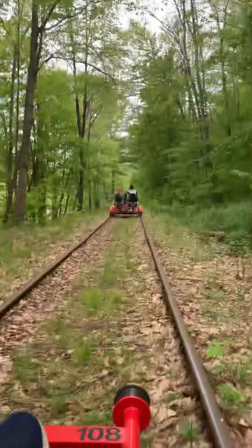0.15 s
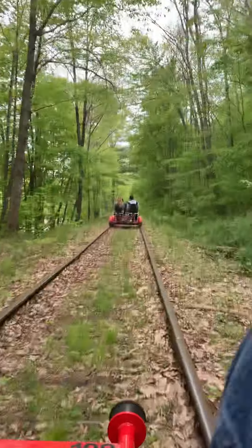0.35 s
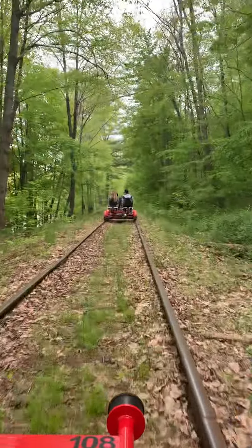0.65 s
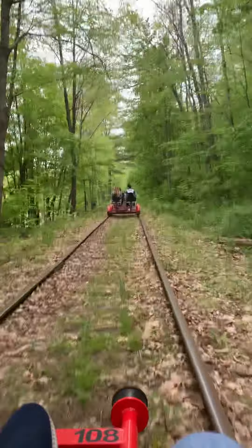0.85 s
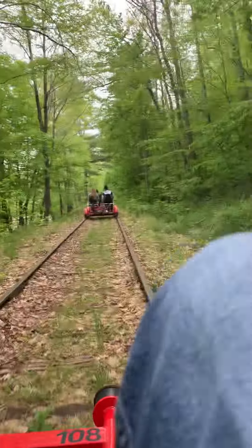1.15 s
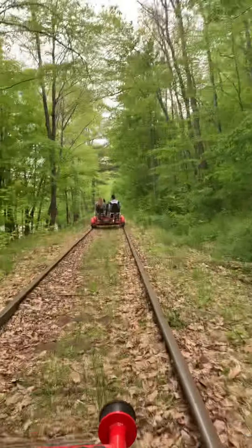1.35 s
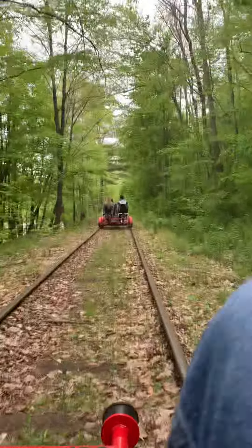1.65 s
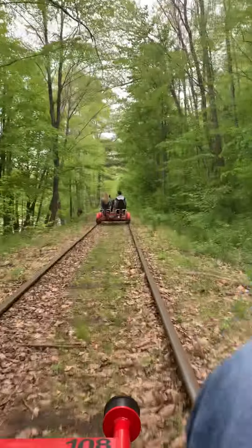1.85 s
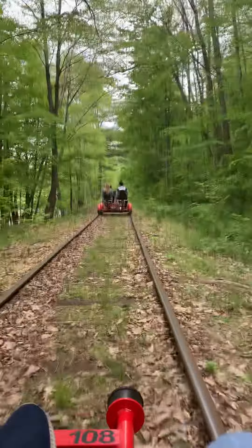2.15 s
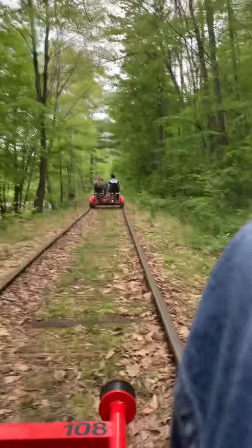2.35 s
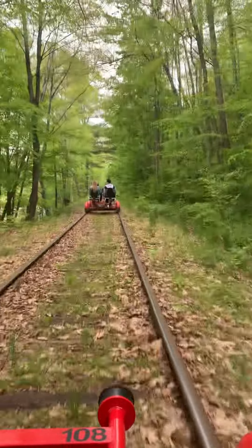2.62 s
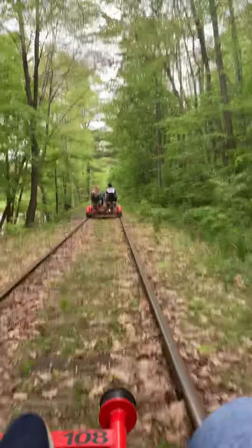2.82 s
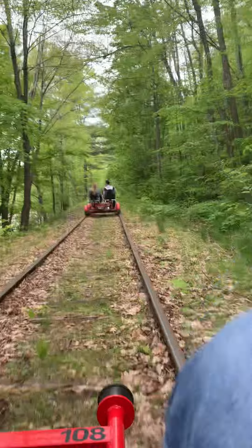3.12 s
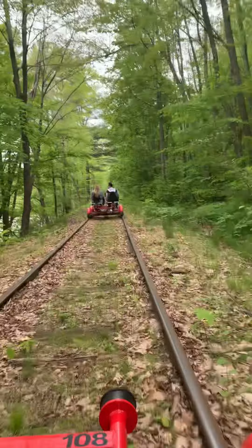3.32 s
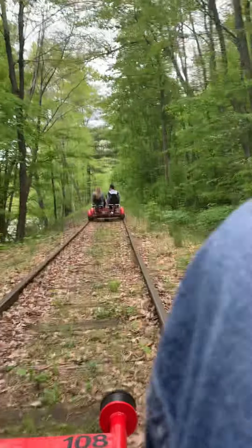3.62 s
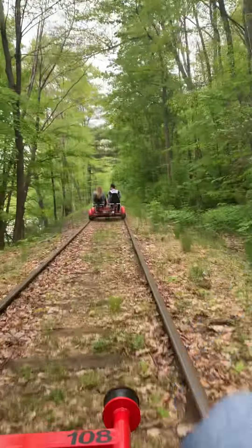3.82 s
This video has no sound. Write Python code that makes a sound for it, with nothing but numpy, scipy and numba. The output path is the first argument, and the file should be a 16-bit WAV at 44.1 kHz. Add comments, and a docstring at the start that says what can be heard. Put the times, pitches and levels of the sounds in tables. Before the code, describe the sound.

A pedal rail cart rolls continuously for about four seconds on rough track, heard close by a handheld phone on board outdoors. Low wavering rumble swells near 0.4 s beneath gritty wheel grind and faint chain hiss. Uneven clacks with quick chatter hit strongly around 0.4, 0.6, 0.9, 1.5, 2.2, 2.9 and 3.25 s. Loose parts rattle between; thin metal ticks appear from 0.9 s, clearest near 1.7, 2.3 and 3.25.

```python
"""A pedal cart rolls on an old rail through woods, heard by a phone held on board.
Throughout, rough rail rings the frame in a low rumble, the wheels grind and the chain hisses.
From the first moments bumps make loose parts clack and chatter; between clacks they knock at random.
Chain links click faintly at random; from 0.9 s a small metal part ticks now and then.
Two microphone ports hear the treble with a fixed lag."""
import sys
import numpy as np
from scipy import signal
from scipy.fft import rfft, irfft
from scipy.io import wavfile
from scipy.ndimage import uniform_filter1d
from numba import njit

SR = 44100
rng = np.random.default_rng(int(sys.argv[2]) if len(sys.argv) > 2 else 0)


def attenuation_scalar(level_db):
    """Turn a level in dB into a linear amplitude multiplier (20 dB per decade)."""
    decades = np.asarray(level_db, float) / 20
    return 10 ** decades


def output_pcm(signal):
    """Save a mono or channel-first signal as 16-bit PCM at the path in sys.argv[1].

    Samples are clipped to [-1, 1] before scaling.
    """
    pcm = np.clip(np.atleast_2d(signal).T, -1, 1) * 32767
    wavfile.write(sys.argv[1], SR, np.round(pcm).astype(np.int16))


N = 175518


def unit(x):
    """Scale to rms 1."""
    return x / np.sqrt(np.mean(x ** 2))


@njit
def svf(x, hz, width_hz):
    """Band-pass whose centre may move, gain 1 at the centre."""
    y = np.empty(x.shape)
    for c in range(x.shape[0]):
        band, low = 0., 0.
        for i in range(x.shape[1]):
            g, k = np.tan(np.pi * hz[i] / SR), width_hz / hz[i]
            v = (band + g * (x[c, i] - low)) / (1 + g * (g + k))
            band, low, y[c, i] = 2 * v - band, low + 2 * g * v, k * v
    return y


def walk(rate_hz):
    """Random levels held 1 / rate s and slewed twice; spread near 1."""
    k = int(SR / rate_hz)
    held = np.repeat(rng.standard_normal(N // k + 1), k)
    return 1.26 * uniform_filter1d(uniform_filter1d(held, k), k)[:N]


def ring(x, modes, drift=0.):
    """Sum of resonators with wandering centres, each at equal power for its dB."""
    out = 0
    for hz, width_hz, db in modes:
        centre_hz = hz * (1 + drift * walk(6))
        out = out + attenuation_scalar(db) * np.sqrt(2000 / width_hz) * svf(x, centre_hz, 1. * width_hz)
    return out


def colour(x, points):
    """Filter to a spectrum of (f/Hz, level/dB) points, closed at both ends."""
    f, p = np.fft.rfftfreq(N, 1 / SR) + 1, np.array(points, float)
    gain_db = np.interp(np.log(f), np.log(p[:, 0]), p[:, 1], -70, -70)
    return irfft(rfft(x) * attenuation_scalar(gain_db), N)


def grit(spread_db):
    """Noise of many small impacts of uneven size, one stream a port."""
    return unit(rng.standard_normal((2, N)) * attenuation_scalar(spread_db * rng.exponential(size=N)))


def flicker(noise, low_hz, shared_db, own_db):
    """Half-octave bands of a noise swell together and flicker alone."""
    shared, out = walk(23.98), 0
    for hz in low_hz * 2 ** (np.arange(9) / 2):
        if hz < 17000:
            gain = attenuation_scalar(shared_db * shared + own_db * walk(36))
            out = out + gain * svf(noise, np.full(N, hz), hz / 3.06)
    return unit(out)


def burst(times_s, gains, length_s, rise_s, tail_s):
    """Envelope: a rise, a chatter that dies over its length, a weaker tail."""
    env, t = np.full(N, 1e-9), np.arange(int(.3 * SR)) / SR
    for s, gain, d in zip(times_s, gains, length_s + 0 * times_s):
        i = int(s * SR)
        decay = np.exp(-(t / d) ** 2) + attenuation_scalar(-7) * np.exp(-t / tail_s)
        env[i:i + len(t)] += gain * ((1 - np.exp(-t / rise_s)) * decay)[:N - i]
    return env


def scattered(per_s, peak_db, spread_db, length_s, rise_s):
    """Envelope of knocks at random moments and of uneven size."""
    moment, weakness = rng.random((int(per_s * N / SR), 2)).T
    return burst(moment * (N - 9) / SR, attenuation_scalar(peak_db - spread_db * weakness), length_s, rise_s, 2 * length_s)


def bounces(times_s, db, count=6):
    """Each hit is a bare impulse and a few weaker rebounds at uneven gaps, in either direction."""
    bounce_s, bounce_db = 0.0035, -2.27  # per rebound
    out, rows, k = np.zeros(N), rng.random((len(times_s), 2, count)), np.arange(count)
    late_s = bounce_s * (k + (k > 0) * (rows[:, 0] - .5))
    at = np.minimum((times_s[:, None] + late_s) * SR, N - 1).astype(int)
    np.add.at(out, at, attenuation_scalar(db[:, None] + bounce_db * k) * np.sign(rows[:, 1] - .5))
    return out


# rail shaking the frame: t/s, rumble level/dB, loudest groan f/Hz
RAIL_SHAKE = [(0.0, -17, 192), (0.02, -23, 241), (0.15, -25, 163), (0.21, -19, 266), (0.35, -22.5, 197),
              (0.4, -9.5, 266), (0.43, -23, 240), (0.7, -19.5, 180), (0.75, -27.5, 184), (0.84, -23, 256),
              (0.99, -25, 193), (1.09, -28, 194), (1.16, -17.5, 275), (1.3, -19.5, 199), (1.38, -22, 216),
              (1.46, -18, 232), (1.51, -22, 303), (1.57, -20.5, 168), (1.63, -20, 294), (1.71, -26.5, 196),
              (1.78, -19, 310), (1.95, -22, 159), (2.07, -22, 325), (2.11, -23, 190), (2.23, -16.5, 172),
              (2.4, -22, 211), (2.65, -23, 210), (2.74, -19.5, 230), (2.77, -26, 250), (2.87, -21, 189),
              (3.06, -21, 262), (3.2, -19, 186), (3.28, -21, 253), (3.35, -17.5, 190), (3.5, -19, 199),
              (3.52, -17, 260), (3.56, -21.5, 205), (3.85, -19.5, 230), (3.89, -21, 173), (3.98, -22, 220)]
# low frame modes: f/Hz, width/Hz, relative level/dB
FRAME_MODES = [(77.6, 120, -11.5), (119, 90, -15.5), (145.7, 18.7, 1), (170.4, 17.4, 0.5), (214, 31, -4.5),
               (256.3, 24, -9), (306, 19.4, -3), (340.3, 23.6, -2), (409, 43, -13.5)]
# wheel contact and chain: t/s, relative grind level/dB, relative hiss level/dB
DRIVE_LEVELS = [(0.0, -26, -50.5), (0.45, -20.5, -41), (0.65, -26.5, -55), (0.82, -23, -45),
                (0.92, -23, -44), (1.06, -28, -42.5), (1.45, -24, -46), (1.58, -26.5, -40),
                (1.72, -28, -54), (1.85, -23.5, -39.5), (2.05, -22.5, -48.5), (2.21, -26, -40.5),
                (2.35, -28.5, -43), (2.55, -25, -43.5), (2.76, -27, -47.5), (3.2, -22.5, -45),
                (3.41, -26, -43), (3.6, -25.5, -46), (3.98, -24, -45)]
# wheel-on-rail grind spectrum: f/Hz, relative level per Hz/dB
GRIND_SPECTRUM = [(250, -29), (450, 7), (650, 11.5), (1000, 4.5), (1500, -6), (2000, -7), (3000, -9),
                  (4200, -12), (6000, -18)]
# chain hiss spectrum: f/Hz, relative level per Hz/dB
CHAIN_SPECTRUM = [(3000, -42), (4500, 1.5), (5700, 5), (6500, -0.5), (8200, 3.5), (10000, -12),
                  (12000, -6.5), (15700, -13)]
# loose-part modes, also in clacks() and rattles(): f/Hz, width/Hz, relative level/dB
PART_MODES = [(169, 130, 4), (324, 87, 3), (599, 58, -1), (780, 43, -3), (980, 110, -4), (1260, 44, 0.5),
              (1480, 185, 1.5), (2040, 110, -5.5), (2510, 67, -8.5), (3202, 65, -10), (3454, 36, -11)]


def rolling(t):
    """Rail roughness rings frame modes and a wandering groan; wheels grind, parts sing, chain hisses."""
    s, rumble_db, groan_hz = np.array(RAIL_SHAKE).T
    rumble = sum(ring(rng.standard_normal((2, N)) * attenuation_scalar(2.0 * walk(14)), [mode], drift=0.061)
                 for mode in FRAME_MODES)
    groan = svf(rng.standard_normal((2, N)), np.interp(t, s, groan_hz), 43.0)
    low = unit(unit(rumble) + attenuation_scalar(-2.5) * unit(groan)) * attenuation_scalar(np.interp(t, s, rumble_db))

    s, grind_db, hiss_db = np.array(DRIVE_LEVELS).T
    grind = flicker(colour(grit(1.2), GRIND_SPECTRUM), 269.0, shared_db=3.0, own_db=3.0)
    # each part swells on its own
    singing = sum(ring(rng.standard_normal((2, N)) * attenuation_scalar(5.8 * walk(31.98)), [mode], drift=0.026)
                  for mode in PART_MODES[2:])
    grind = unit(grind + attenuation_scalar(-3.5) * unit(singing))
    hiss = flicker(colour(grit(3.3), CHAIN_SPECTRUM), 1710.0, shared_db=3.0, own_db=2.3)
    grind = grind * attenuation_scalar(np.interp(t, s, grind_db) - 1.54)
    hiss = hiss * attenuation_scalar(np.interp(t, s, hiss_db) + 3.0)
    return low + grind + hiss


# bumps: t/s, relative level/dB, loudest ring f/Hz, chatter length/s, scrape re clack level/dB
CLACK_EVENTS = [(0.019, -10, 580, 0.032, -18), (0.387, -4, 806, 0.025, -19), (0.592, -5, 605, 0.017, -36),
                (0.684, -13.5, 890, 0.022, -39), (0.792, -18, 1460, 0.031, -20),
                (0.84, -16, 660, 0.059, -17), (0.885, -21, 1000, 0.048, -12), (0.931, -2, 3370, 0.02, -14),
                (1.167, -13, 1195, 0.028, -13), (1.272, -8.5, 760, 0.026, -15.5),
                (1.454, -20, 745, 0.042, -13), (1.479, -9.5, 1230, 0.018, -21),
                (1.495, -4.5, 1260, 0.02, -17.5), (1.571, -17, 1310, 0.046, -15),
                (1.621, -16.5, 480, 0.04, -31), (1.789, -17.5, 1230, 0.034, -32),
                (1.855, -7, 590, 0.017, -17), (2.111, -15.5, 2040, .025, -36),
                (2.173, -5.5, 1374, 0.011, -15.5), (2.248, -19.5, 1470, 0.018, -24),
                (2.416, -6.5, 1520, 0.026, -34), (2.544, -17, 710, 0.022, -31),
                (2.727, -8, 800, 0.049, -24), (2.8922, -6, 1376, 0.009, -40),
                (2.977, -15, 1480, 0.029, -40), (3.001, -7.5, 2630, 0.038, -21),
                (3.067, -12, 1480, 0.026, -23), (3.2, -15.5, 2450, 0.015, -32),
                (3.2537, -4.5, 1500, 0.0092, -13.5), (3.284, -18, 1260, .02, -31),
                (3.376, -17.5, 1020, 0.038, -39), (3.508, -18, 1305, 0.016, -15),
                (3.713, -15, 2670, .02, -35), (3.804, -9, 580, 0.029, -17), (3.963, -24, 955, 0.032, -32)]


def clacks(t):
    """A hard blow with rebounds, then chatter: part modes in a new mix, one loudest ring, a scrape."""
    rise_s, tail_s = 0.0024, 0.054
    hardness, blow_db = 1.32, 19  # the bare blow grows faster than the chatter
    s, db, ring_hz, length_s, bright_db = np.array(CLACK_EVENTS).T
    chatter = grit(1.23) * attenuation_scalar(2.0 * walk(160)) * burst(s, attenuation_scalar(db - 2.5), length_s, rise_s, tail_s)
    blows = bounces(s + 0.00097, hardness * db + blow_db)
    hits = colour(blows + chatter, [(60, 6.5), (4000, -2.0), (6000, -3.5), (16000, -6.5)])

    now = np.clip(np.searchsorted(s, t) - 1, 0, None)  # index of the latest clack
    mix_db = 3 * rng.standard_normal((len(s), len(PART_MODES)))
    parts = sum(ring(hits * attenuation_scalar(mix_db[now, k]), [mode], drift=0.015)
                for k, mode in enumerate(PART_MODES))
    loudest = attenuation_scalar(7) * svf(hits, ring_hz[now], 65.)
    broad = colour(hits, [(300, -5), (700, 2), (1500, 0), (2500, -10), (4500, -27)])
    scrape = colour(grit(1.5), [(2500, 18), (4500, 11), (6000, 10.5), (8500, -4), (12000, -20),
                                (16000, -50)])
    scrape = unit(scrape) * burst(s, attenuation_scalar(db + bright_db), 2.16 * length_s, rise_s, tail_s)
    return attenuation_scalar(-16.5) * parts + loudest + attenuation_scalar(-3.5) * broad + attenuation_scalar(-8.5) * scrape


def rattles():
    """Each loose part knocks by itself at random moments and rings its own mode."""
    out = 0
    for mode in PART_MODES[2:]:
        env = scattered(per_s=36, peak_db=-33.5, spread_db=17, length_s=0.0078, rise_s=0.0024)
        out = out + ring(rng.standard_normal((2, N)) * env, [mode], drift=0.011)
    return out


# metal ticks: t/s, relative level/dB
TICK_EVENTS = [(0.888, -19), (1.272, -25), (1.4544, -34), (1.735, -14), (2.291, -12), (2.3875, -36),
               (3.056, -20), (3.2016, -33), (3.2547, -12.5), (3.386, -21), (1.408, -41)]
# modes of the small metal part: f/Hz, width/Hz, relative level/dB
TICK_RING = [(3670, 490, -7.5), (5260, 440, 5.5), (7170, 180, -3.5), (8440, 260, 3.5), (9000, 400, -5),
             (10200, 310, -14.5), (12200, 600, -22), (14500, 900, -18)]


def ticks():
    """A small hard metal part snaps on short high modes; chain links click faintly on the same modes."""
    rise_s = 0.00026
    s, db = np.array(TICK_EVENTS).T
    tick_env = burst(s, attenuation_scalar(db), 0.0092, rise_s, tail_s=0.021)
    link_env = scattered(per_s=31, peak_db=-28, spread_db=14, length_s=0.0034, rise_s=rise_s)
    snaps = bounces(s, db + 9, count=3)
    return attenuation_scalar(-10.5) * ring(grit(1.6) * (tick_env + link_env) + snaps, TICK_RING)


def scene():
    """Sum of all sources, two streams."""
    t = np.arange(N) / SR
    return rolling(t) + clacks(t) + rattles() + ticks()


def top_cut(x):
    """Nothing passes above the cut-off."""
    return signal.sosfilt(signal.butter(12, 16650, fs=SR, output="sos"), x)


# ports below the treble: f/Hz, likeness/0-1, right trails left/rad, left minus right gain/dB
PORT_PAIR = [(60, 0.98, 0.33, 0.5), (180, 1, 0, -4), (366, 0.91, 0.67, -5.5), (510, 0.45, 1.4, -2),
             (840, 0.13, 0, -2.5), (1290, 0.6, 0.3, -1), (1990, 0.22, 1.34, -1.3), (2830, 0.1, 1.2, -.8),
             (3770, 0.3, 3.3, 2)]


def record(dry):
    """Peaks round, lows and top are cut; right port shares part of left, all of the treble with a lag."""
    treble_from_hz, in_step_hz, lag_s = 3400, 6801, 1 / 4150
    low_cut_hz, top_hz = 42, 15800
    f, p = np.fft.rfftfreq(N, 1 / SR) + 1, np.array(PORT_PAIR, float)
    like, turn, lean_db = (np.interp(np.log(f), np.log(p[:, 0]), p[:, k]) for k in range(1, 4))
    treble = f > treble_from_hz
    like = np.where(treble, 1, np.clip(like, 0, 1))
    lean_db = np.where(treble, 0, lean_db)
    turn = np.where(treble, 2 * np.pi * (f - in_step_hz) * lag_s, turn)
    # treble phase within flat_rad of a multiple of pi is set to it
    near = np.pi * np.round(turn / np.pi)
    flat_rad = 0.77 + 0.076 * (f / 1000 - 8)
    turn = np.where(treble & (abs(turn - near) < flat_rad), near, turn)

    rounded = np.tanh(0.78 * dry) / 0.81
    left, other = rfft(rounded) * (f < top_hz) / np.sqrt(1 + (low_cut_hz / f) ** 6)
    right = like * left * np.exp(-1j * turn) + np.sqrt(1 - like ** 2) * other
    pair = irfft(np.array([left * attenuation_scalar(lean_db / 2), right * attenuation_scalar(-lean_db / 2)]), N)
    return top_cut(pair)


dry = scene()
out = record(dry)
output_pcm(out)
```